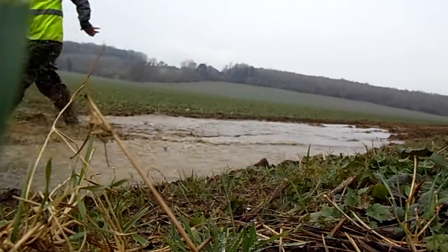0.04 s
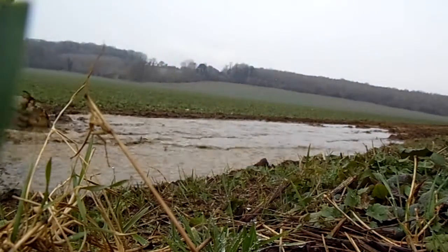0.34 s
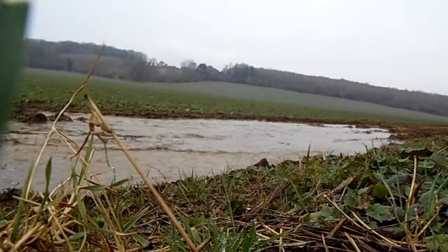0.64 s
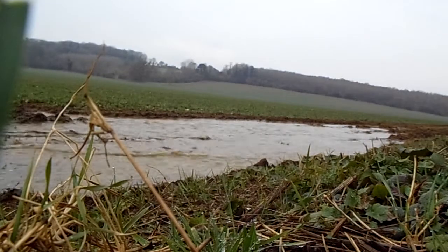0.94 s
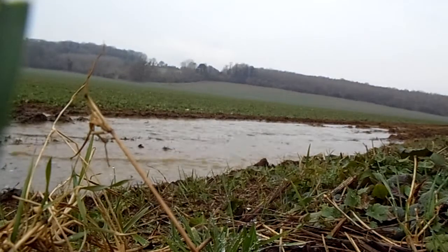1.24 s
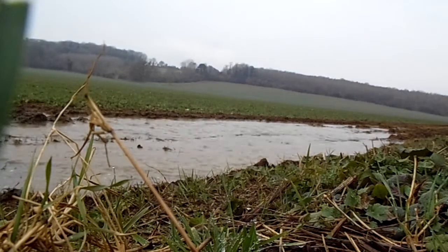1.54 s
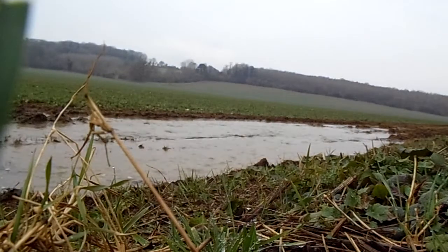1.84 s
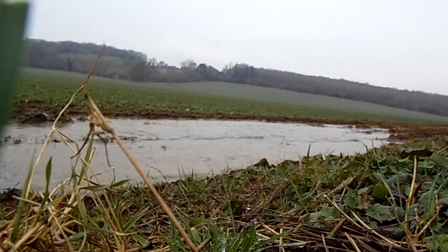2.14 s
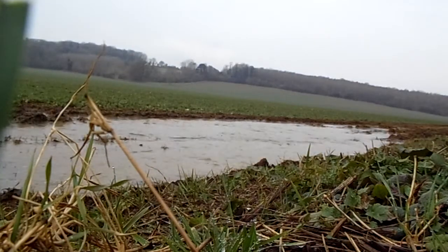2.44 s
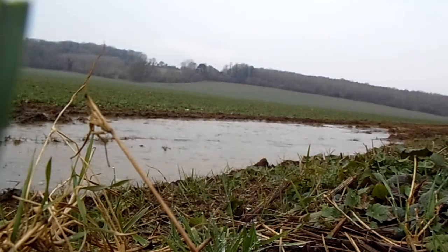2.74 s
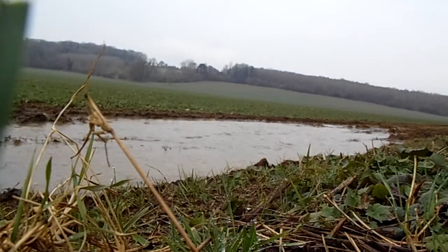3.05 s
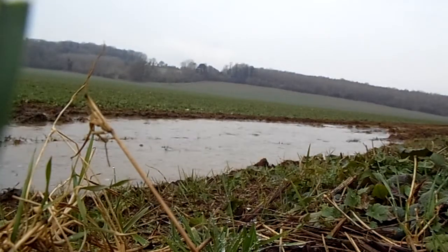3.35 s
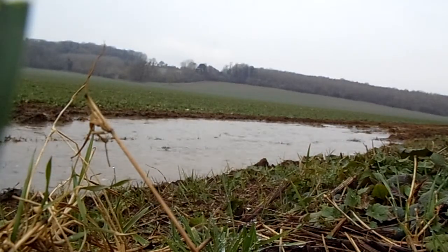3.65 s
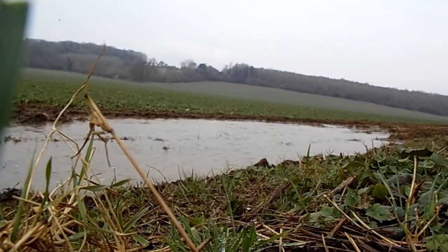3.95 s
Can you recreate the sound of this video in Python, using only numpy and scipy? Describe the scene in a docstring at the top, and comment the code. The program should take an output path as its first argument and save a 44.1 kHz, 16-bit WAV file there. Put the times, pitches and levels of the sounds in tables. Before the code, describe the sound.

Water splashes and sloshes as someone wades out of a muddy puddle beside a field. Spray patters down, ripples gurgle at the bank and thin to drips. Wind buffets the microphone, and a faint bird calls near the end.

```python
"""Wading out of a muddy puddle.

Thrown water rains back as showers of tiny drop impacts; waves slap and gurgle along the bank
as clouds of ringing air bubbles. Wind buffets the single microphone over the hush of a field.
A small bird calls far off once the water calms."""
import sys
import numpy as np
from scipy import signal
from scipy.fft import rfft, irfft
from scipy.io import wavfile
from scipy.ndimage import uniform_filter1d

SR = 44100
rng = np.random.default_rng(int(sys.argv[2]) if len(sys.argv) > 2 else 0)


def transcribe(signal):
    """Save signal, clipped to [-1, 1], as a 16-bit WAV file at the path in sys.argv[1]."""
    frames = np.atleast_2d(signal).T
    limited = np.clip(frames, -1, 1)
    pcm = np.round(limited * 32767).astype(np.int16)
    wavfile.write(sys.argv[1], SR, pcm)


N = 176400
T = np.arange(N) / SR

# distant hush spectrum: freq_hz, relative_db
HUSH_SPECTRUM = [(100, 11.5), (600, -5.5), (2500, -16.5), (10000, -25.5), (15500, -20)]
# buffeting spectrum: freq_hz, relative_db
WIND_SPECTRUM = [(20, 5), (55, 3), (125, -10.5), (240, -30), (800, -62)]
# gusts on the microphone: crest_s, level_db, rise_and_fall_s
GUSTS = [(0.085, -20.5, 0.018), (.23, -31.5, 0.048), (0.784, -25, 0.03), (0.941, -33.5, 0.051),
         (1.45, -23.5, 0.14), (1.901, -22, 0.044), (2.056, -22.5, 0.013), (2.24, -28, 0.12),
         (3.279, -30, 0.076), (3.542, -34, 0.048)]
# falling trill contour: time_s, pitch_hz, level_db
TRILL_CURVE = [(2.769, 4700, -62), (2.82, 4280, -52), (2.88, 4030, -50.5), (2.99, 3240, -59)]
# arched chirps: start_s, level_db
BIRD_CHIRPS = [(3.175, -57), (3.314, -59), (3.625, -60)]
# stirred water envelope: time_s, spray_db, gurgle_db
WASH_CURVE = [(0, -33, -43.5), (.14, -33.5, -42.5), (.26, -37, -44), (.68, -40, -51.5), (.85, -45.5, -47),
              (.99, -40, -51), (1.2, -41.5, -50.5), (1.42, -44, -49.5), (1.58, -56.5, -58.5),
              (1.75, -49, -86), (2.04, -57, -76), (2.27, -47.5, -54), (2.58, -66.5, -80),
              (3.07, -58.5, -59.5), (3.25, -66.5, -85), (3.9, -58, -64.5)]
# falling spray spectrum: freq_hz, relative_db
SPRAY_SPECTRUM = [(700, -5.5), (1900, -10.5), (2900, -11), (7200, -7), (10000, -8), (15500, -17.5)]
# splash spectrum: freq_hz, relative_db
SPLASH_SPECTRUM = [(600, -3), (2700, 3.5), (4200, 2), (9000, 4.5), (15500, -5)]
# thrown sheets of water: crest_s, level_db, fall_s
SHEETS = [(0.146, -36, 0.093), (0.562, -28, 0.022), (0.61, -33.5, 0.042), (0.716, -30, 0.0046),
          (0.739, -35, 0.017), (1.047, -31.5, 0.022), (1.115, -30.5, 0.02), (1.268, -33.5, 0.0044),
          (1.693, -39.5, 0.022), (1.733, -35.5, 0.019), (1.808, -38, 0.0053), (2.207, -35.5, 0.01),
          (2.343, -33, 0.016), (2.422, -41.5, 0.017), (3.113, -42, 0.025), (3.785, -45, 0.037),
          (3.832, -33, 0.0092)]
# lone drops on mud: start_s, level_db
LONE_DROPS = [(1.297, -36), (1.338, -43), (1.625, -39), (1.732, -28.5), (1.819, -34), (1.886, -34),
              (1.982, -38.5), (2.079, -41.5), (2.17, -38.5), (2.232, -35), (2.891, -44), (3.216, -42.5),]
# waves folding over air: start_s, level_db, centre_hz, fall_s
WAVE_FOLDS = [(.40, -34, 590, 0.021), (.715, -27.5, 784, 0.015), (.925, -40, 726, 0.04),
              (1.043, -27, 884, 0.012), (1.297, -29.5, 2170, 0.0033), (1.692, -43, 750, 0.01),
              (1.898, -39, 770, 0.0096), (2.171, -42.5, 750, 0.011), (2.222, -37.5, 930, .02),
              (2.415, -44.5, 737, 0.018), (3.123, -35, 900, 0.012), (3.831, -38, 940, 0.0063)]
# single large bubbles: start_s, level_db, pitch_hz, t60_s
LARGE_BUBBLES = [(.385, -25, 465, 0.093), (0.7154, -3, 890, 0.0054), (.719, -32, 516, 0.027),
                 (.915, -25.5, 746, 0.081), (1.338, -28, 1260, 0.021), (1.692, -23, 730, 0.016),
                 (2.221, -31, 462, 0.094), (2.785, -37, 2080, 0.022), (3.119, -24.5, 610, 0.018),
                 (3.673, -40, 498, 0.042), (3.982, -25, 599, 0.038)]

HUSH_DB, BREEZE_DB, WIND_LUMP_DB = -53.5, -48.5, 3
FLUTTER_GAIN_DB, FLUTTER_HZ, FLUTTER_EXPONENT = -11, 142, 0.92
TRILL_PAIRS_PER_S, TRILL_SWING_HZ = 44.8, 300
CHIRP_S, CHIRP_TOP_HZ, CHIRP_SCOOP_HZ, CHIRP_CREST_FRACTION, CHIRP_WAVER_HZ = .055, 4370, 597, .65, 70
ECHO_GAIN_DB, ECHO_FALL_S = -17, 0.059
IMPACT_SPREAD_DB = 0.5
BUBBLE_T60_CYCLES, BUBBLE_RISE_PER_T60, BUBBLE_SPREAD_DB = 28, .26, 3.5
SPRAY_GAIN_DB, SPRAY_IMPACTS_PER_S, SPRAY_CLUMP_DB = 0.5, 6500, 1.4
PLINK_GAIN_DB, PLINKS_PER_S, PLINK_HZ = -10, 220, 2310
GURGLE_GAIN_DB, GURGLES_PER_S, GURGLE_HZ, CHURN_GAIN_DB = 2.5, 170, 802, -9.5
TICK_GAIN_DB, TICKS_PER_S, TICK_FALL_S = -2.5, 110, .0005
SPLASH_RISE_S, SPLASH_IMPACTS_PER_S, SPLASH_PLINK_GAIN_DB = 0.0057, 2600, -6
DROP_FALL_S, DROP_RING_GAIN_DB, DROP_RING_HZ = 0.0028, 1, 6580
SLOP_T60_CYCLES, SLOP_SPREAD_OCTAVES, SLOP_RISE_S = 12, .45, .003
CUTOFF_HZ = 15750


def from_db(db):
    """Decibels to gain."""
    return 10 ** (np.asarray(db) / 20)


def unit_rms(x):
    """Scale to unit power."""
    return x / np.sqrt(np.mean(x ** 2) + 1e-20)


def per_sample(curve):
    """Interpolate each column of a curve over time."""
    time_s, *columns = np.transpose(curve)
    return [np.interp(T, time_s, column) for column in columns]


def add(out, start_s, sound):
    """Mix a sound in at start_s."""
    i = max(int(start_s * SR), 0)
    out[i:i + len(sound)] += sound[:max(N - i, 0)]


def coloured(x, spectrum):
    """Minimum-phase filter following a spectrum; unit power."""
    hz, db = np.transpose(spectrum)
    bin_hz = np.maximum(np.fft.rfftfreq(N, 1 / SR), 1)
    gain = from_db(np.interp(np.log(bin_hz), np.log(hz), db))
    gain /= np.sqrt(1 + (hz[0] / 2 / bin_hz) ** 4)  # low cut
    cepstrum = irfft(np.log(gain), N)
    response = np.exp(rfft(2 * cepstrum * (np.arange(N) < N // 2)))
    return unit_rms(irfft(rfft(x) * response, N))


def band_noise(centre_hz, octaves):
    """Turbulence spanning octaves either side of centre_hz; unit power."""
    edges_hz = [centre_hz / 2 ** octaves, centre_hz * 2 ** octaves]
    band = signal.butter(2, edges_hz, "band", fs=SR, output="sos")
    return unit_rms(signal.sosfilt(band, rng.standard_normal(N)))


def drift(corner_hz):
    """Slow random wander; unit power."""
    bin_hz = np.fft.rfftfreq(N, 1 / SR)
    return unit_rms(irfft(rfft(rng.standard_normal(N)) / (1 + (bin_hz / corner_hz) ** 2), N))


def evened(x, samples):
    """Hold local power steady."""
    power = uniform_filter1d(uniform_filter1d(x * x, samples), samples)
    return x / np.sqrt(np.abs(power) + 1e-12)


def swell(crest_s, rise_s, fall_s):
    """Exponential rise and fall about a crest."""
    tau_s = np.where(T < crest_s, rise_s, fall_s)
    return np.exp(np.maximum(-np.abs(T - crest_s) / tau_s, -40))


def hush():
    """Steady, distant noise of open country."""
    return from_db(HUSH_DB) * coloured(rng.standard_normal(N), HUSH_SPECTRUM)


def wind():
    """Lumpy low buffeting on the microphone; strong gusts add a higher flutter."""
    gust_power = sum((from_db(db) * swell(crest_s, tau_s, tau_s)) ** 2 for crest_s, db, tau_s in GUSTS)
    strength = np.sqrt(from_db(BREEZE_DB) ** 2 + gust_power)
    buffet = evened(coloured(rng.standard_normal(N), WIND_SPECTRUM), samples=1800)
    flutter_gain = from_db(FLUTTER_GAIN_DB) * (strength / strength.max()) ** FLUTTER_EXPONENT
    flutter = flutter_gain * band_noise(FLUTTER_HZ, octaves=0.41)
    return strength * from_db(WIND_LUMP_DB * drift(corner_hz=17)) * (buffet + flutter)


def bird():
    """A falling trill of paired notes, then three wavering arched chirps."""
    centre_hz, trill_db = per_sample(TRILL_CURVE)
    first_s, last_s = TRILL_CURVE[0][0], TRILL_CURVE[-1][0]
    slot = 3 * (TRILL_PAIRS_PER_S * (T - first_s) % 1)  # two notes, one rest
    notes = np.abs(np.sin(np.pi * slot)) * (slot < 2) * (T > first_s) * (T < last_s)
    trill_hz = centre_hz + TRILL_SWING_HZ * (2 * (slot % 1) - 1)
    song = from_db(trill_db) * notes * np.sin(2 * np.pi * np.cumsum(trill_hz) / SR)
    progress = np.linspace(0, 1, int(CHIRP_S * SR))
    arch_hz = CHIRP_TOP_HZ - CHIRP_SCOOP_HZ * (progress / CHIRP_CREST_FRACTION - 1) ** 2
    for start_s, db in BIRD_CHIRPS:
        chirp_hz = arch_hz + CHIRP_WAVER_HZ * drift(corner_hz=150)[:len(progress)]
        tone = np.sin(2 * np.pi * np.cumsum(chirp_hz) / SR)
        add(song, start_s, from_db(db) * np.sin(np.pi * progress) * tone)
    return song


def across_field(sound):
    """Distance blurs a sound with a short scattered echo."""
    scatter = rng.standard_normal(N) * swell(0, ECHO_FALL_S, ECHO_FALL_S)
    echo = signal.fftconvolve(sound, scatter / np.linalg.norm(scatter))[:N]
    return sound + from_db(ECHO_GAIN_DB) * echo


def impacts(per_s, size_cap):
    """Droplet impulses, random in time, size and sign."""
    size_db = IMPACT_SPREAD_DB * np.minimum(rng.exponential(1, N), size_cap)
    return from_db(size_db) * rng.choice([-1, 1], N) * (rng.random(N) < per_s / SR)


def patter(per_s, spectrum, mist_gain):
    """Dense droplet impacts over a fine mist."""
    hits = unit_rms(impacts(per_s, size_cap=5))
    return coloured(hits + mist_gain * rng.standard_normal(N), spectrum)


def mud_ticks():
    """Scattered droplets hit wet mud, each with a tiny spatter."""
    hits = np.abs(impacts(TICKS_PER_S, size_cap=3))
    spatter = signal.lfilter([1], [1, -np.exp(-1 / (TICK_FALL_S * SR))], hits + 1e-18)
    return evened(coloured(spatter * rng.standard_normal(N), SPRAY_SPECTRUM), samples=6000)


def bubble(pitch_hz, t60_s):
    """Trapped air rings down while its pitch rises."""
    age_s = np.arange(int(t60_s * SR) + 2) / SR
    cycles = pitch_hz * age_s * (1 + BUBBLE_RISE_PER_T60 * age_s / t60_s / 2)
    envelope = np.exp(-np.log(1000) * age_s / t60_s) * (1 - np.exp(-2 * cycles))
    return envelope * np.sin(2 * np.pi * cycles)


def bubbling(per_s, centre_hz, octaves, count=4000):
    """A steady stream of bubbles, pitches spread about centre_hz."""
    out = np.zeros(N)
    starts_s = rng.random(count) * count / per_s
    deviations = rng.standard_normal((count, 3)).clip(-2, 2)
    for start_s, (detune, size, ring) in zip(starts_s, deviations):
        if start_s < N / SR:
            hz = centre_hz * 2 ** (octaves * detune)
            t60_s = BUBBLE_T60_CYCLES / hz * 2 ** (ring / 2)
            add(out, start_s, from_db(BUBBLE_SPREAD_DB * size) * bubble(hz, t60_s))
    return evened(out, samples=4000)


def wash():
    """Stirred water: falling spray, plinks and droplet ticks; deeper gurgle over a dull churn."""
    spray_db, gurgle_db = per_sample(WASH_CURVE)
    clumps = from_db(SPRAY_GAIN_DB + SPRAY_CLUMP_DB * drift(corner_hz=31))
    spray = clumps * evened(patter(SPRAY_IMPACTS_PER_S, SPRAY_SPECTRUM, mist_gain=1), samples=3000)
    plinks = from_db(PLINK_GAIN_DB) * bubbling(PLINKS_PER_S, PLINK_HZ, octaves=0.5)
    gurgle = from_db(GURGLE_GAIN_DB) * bubbling(GURGLES_PER_S, GURGLE_HZ, octaves=0.523)
    churn = from_db(CHURN_GAIN_DB) * band_noise(GURGLE_HZ, octaves=1)
    droplets = mud_ticks() + bubbling(TICKS_PER_S, DROP_RING_HZ, octaves=0.506)
    ticks = from_db(TICK_GAIN_DB) * unit_rms(droplets)
    return from_db(spray_db) * (spray + plinks + ticks) + from_db(gurgle_db) * (gurgle + churn)


def splashes():
    """Sheets of water break into droplets and tiny bubbles; lone drops smack and ring briefly."""
    sheets = sum(from_db(db) * swell(crest_s, SPLASH_RISE_S, fall_s) for crest_s, db, fall_s in SHEETS)
    drops = sum(from_db(db) * swell(start_s, DROP_FALL_S / 10, DROP_FALL_S) for start_s, db in LONE_DROPS)
    shower = evened(patter(SPLASH_IMPACTS_PER_S, SPLASH_SPECTRUM, mist_gain=0.25), samples=350)
    plinks = from_db(SPLASH_PLINK_GAIN_DB) * bubbling(per_s=800, centre_hz=DROP_RING_HZ, octaves=0.49)
    out = np.hypot(sheets, drops) * shower + sheets * plinks
    for start_s, db in LONE_DROPS:
        hz = DROP_RING_HZ * 2 ** rng.uniform(-0.52, 0.53)
        add(out, start_s, from_db(db + DROP_RING_GAIN_DB) * bubble(hz, 2 * BUBBLE_T60_CYCLES / hz))
    return out


def slops(count=22):
    """Each folding wave traps a cloud of short-lived bubbles; large ones ring singly."""
    out = np.zeros(N)
    for start_s, db, centre_hz, fall_s in WAVE_FOLDS:
        delays_s = 4 * fall_s * ((np.arange(count) + rng.random(count)) / count) ** 1.3
        pitches_hz = centre_hz * 2 ** (SLOP_SPREAD_OCTAVES * rng.standard_normal(count).clip(-2, 2))
        cloud = np.zeros(N)
        for delay_s, hz in zip(delays_s, pitches_hz):
            add(cloud, start_s - SLOP_RISE_S + delay_s, bubble(hz, SLOP_T60_CYCLES / hz))
        crest = cloud[int(start_s * SR):int((start_s + fall_s) * SR) + 2]
        envelope = swell(start_s + fall_s / 2, SLOP_RISE_S + fall_s / 2, fall_s)
        out += from_db(db) * envelope * cloud / (crest.std() + 1e-6)
    for start_s, db, hz, t60_s in LARGE_BUBBLES:
        add(out, start_s, from_db(db) * bubble(hz, t60_s))
    return out


def scene():
    """One microphone, same signal in both channels."""
    mono = wash() + splashes() + slops() + wind() + hush() + across_field(bird())
    return np.tile(mono, (2, 1))


def record(dry):
    """Steep low-pass."""
    return signal.sosfilt(signal.ellip(12, .1, 90, CUTOFF_HZ, fs=SR, output="sos"), dry)


dry = scene()
out = record(dry)
transcribe(out)
```